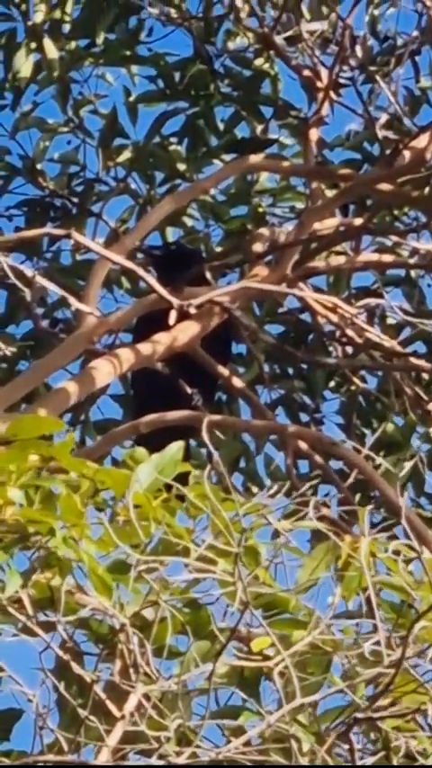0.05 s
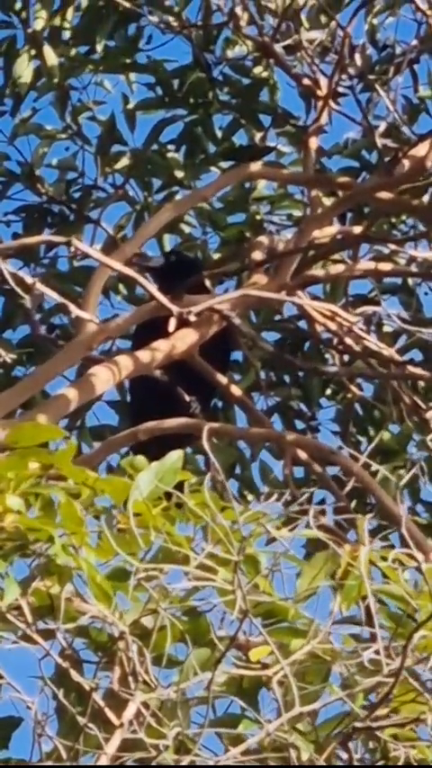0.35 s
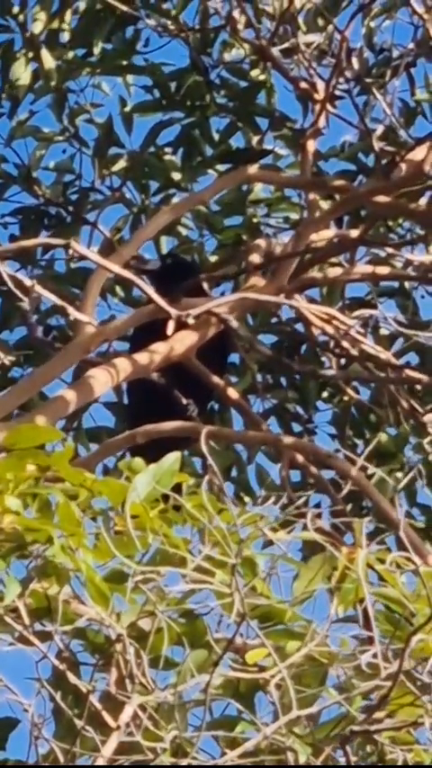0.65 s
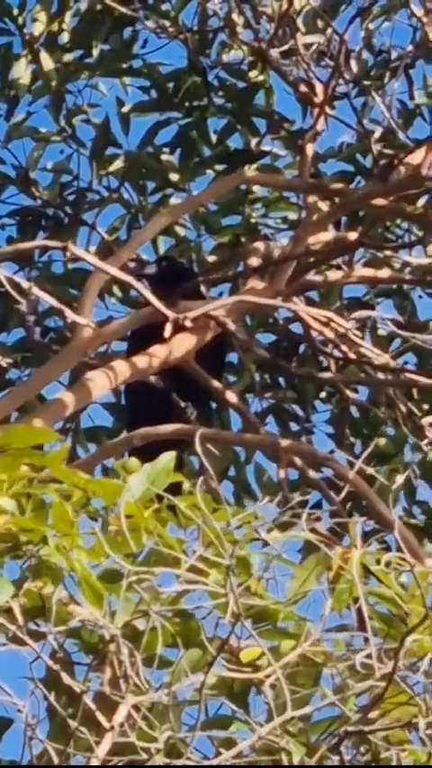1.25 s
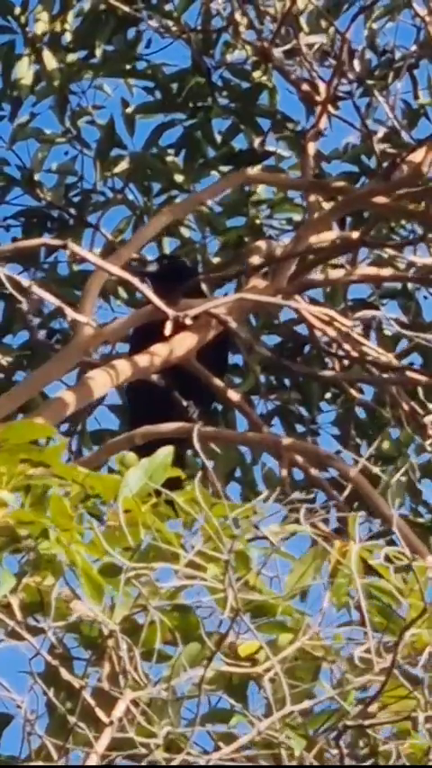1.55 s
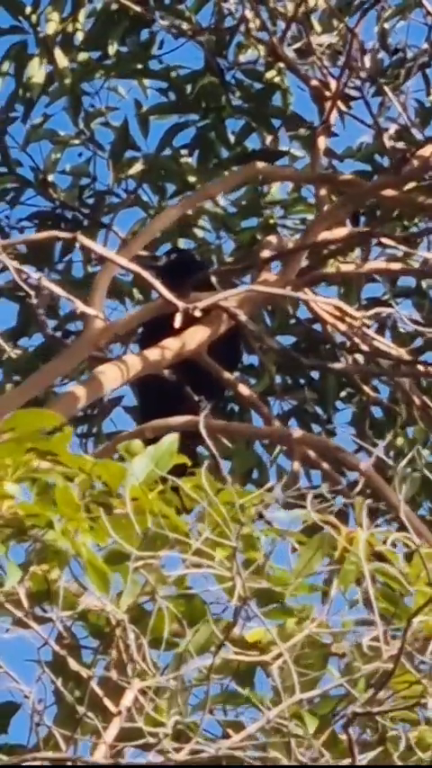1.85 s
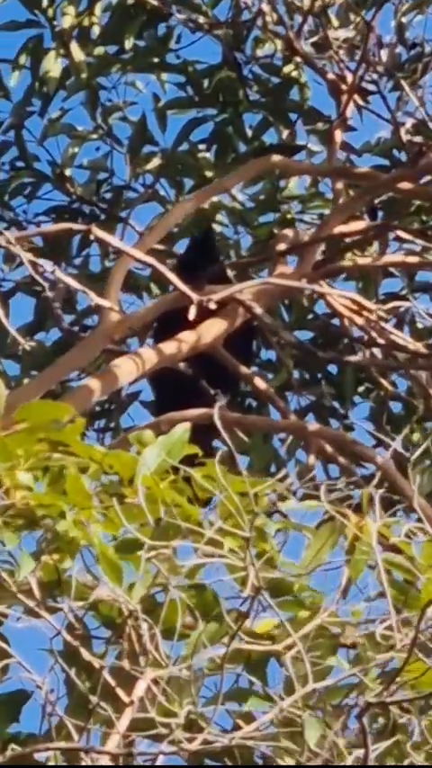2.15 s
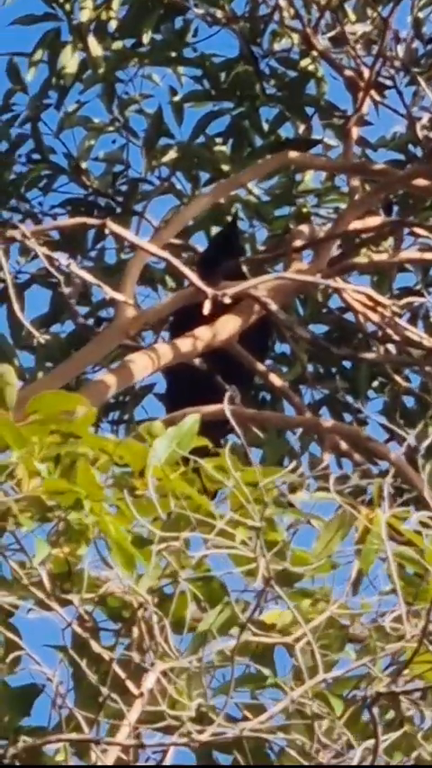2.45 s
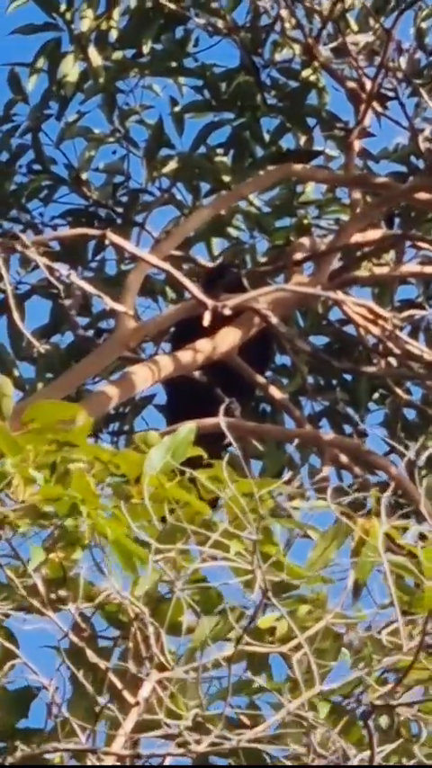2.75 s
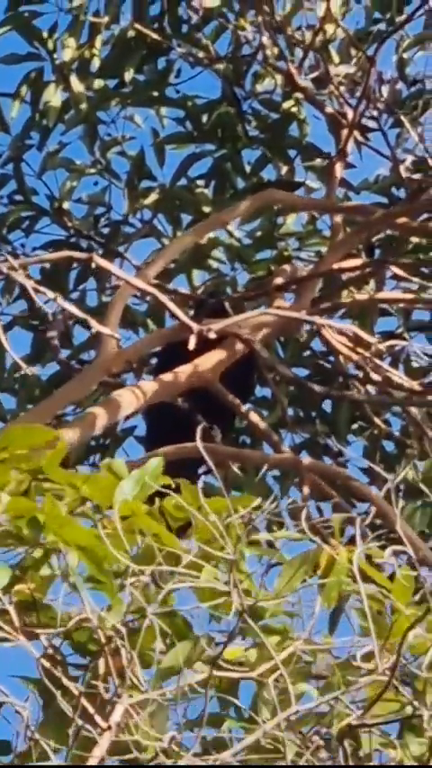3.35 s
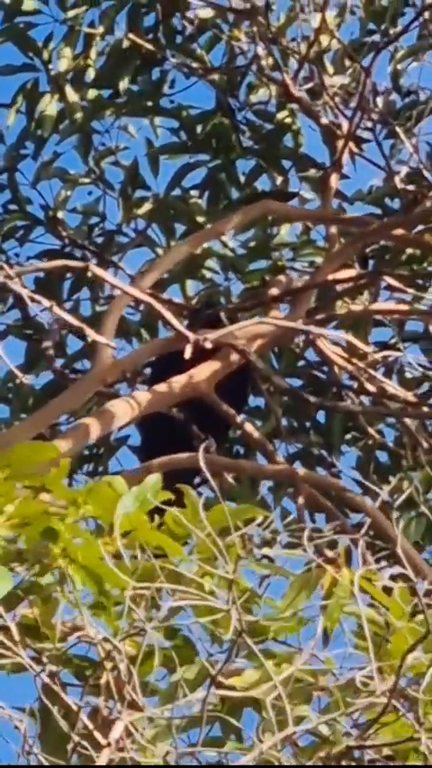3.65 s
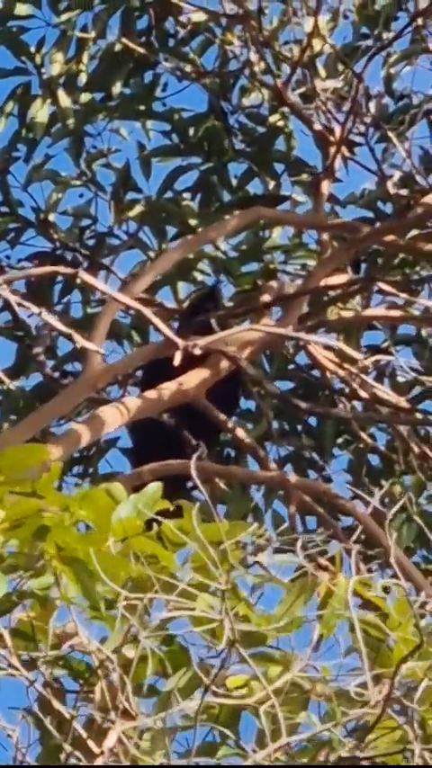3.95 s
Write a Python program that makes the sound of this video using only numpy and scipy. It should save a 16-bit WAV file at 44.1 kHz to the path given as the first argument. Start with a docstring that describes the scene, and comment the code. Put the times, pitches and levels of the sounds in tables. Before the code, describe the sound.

A dry, fast-pulsing bird trill rings from a treetop with a slight echo. It follows a quiet outdoor stretch of low wind rumble, growing leaf rustle, one small microphone tap and faint peeps and whistles from far birds.

```python
"""First comes a low outdoor rumble, with leaves rustling in a rising breeze that also bumps the microphone.
The microphone gets one small tap, tiny birds peep, a far bird trills faintly and a few dry twigs tick.
In the last second a bird high in a tree gives a dry, knocking trill, about 17 pulses a second.
Each pulse rings its throat, then bounces back off the ground and the trees."""
import sys
import numpy as np
from scipy import signal
from scipy.fft import rfft, irfft
from scipy.io import wavfile
from scipy.ndimage import uniform_filter1d

SR = 44100
rng = np.random.default_rng(int(sys.argv[2]) if len(sys.argv) > 2 else 0)


def to_wav(sig):
    """Store sig (one row per channel, or 1-D mono) as 16-bit WAV at the path in sys.argv[1].

    Samples outside -1..1 are clipped; the rate is SR.
    """
    pcm = np.clip(np.atleast_2d(sig), -1, 1) * 32767
    pcm = np.round(pcm).astype(np.int16)
    wavfile.write(sys.argv[1], SR, pcm.T)  # frames by channels


N = 176400

# how alike leaves and twigs sound on the left and right: f/Hz, likeness (1 = the same)
LEAF_LIKENESS = [(3000, 0.0074), (4500, 0), (7000, 0.27), (9000, 1), (15000, 0.76)]
FAR_FADE_S = 0.97  # echo of the far birds; a fade time is how long a sound takes to drop 60 dB


def undb(db):
    """Turn decibels into a factor to multiply by."""
    return 10 ** (np.asarray(db) / 20)


def curve(rows):
    """Join rows of (t/s, value) with straight lines."""
    return np.interp(np.arange(N) / SR, *np.array(rows).T)


def by_freq(rows):
    """Join rows of (f/Hz, value), giving each octave about equal room."""
    hz, value = np.array(rows).T
    return np.interp(np.log(np.fft.rfftfreq(N, 1 / SR) + 1), np.log(hz + 1), value)


def pan(db):
    """Factors that make the left side db louder than the right."""
    return undb(np.array([[db], [-db]]) / 2)


def unit(x):
    """Scale to an average strength (rms) of 1."""
    return x / np.sqrt(np.mean(x ** 2))


def walk(rate):
    """A smooth random wobble; a higher rate makes it faster."""
    width = max(int(SR / rate), 1)
    smoothed = uniform_filter1d(rng.standard_normal(N), width, mode="wrap")
    return unit(uniform_filter1d(smoothed, width, mode="wrap"))


def fade(t, fade_s):
    """Die away by 60 dB every fade_s seconds."""
    return np.exp(-np.log(1000) * t / fade_s)


def ring(t, hz, fade_s):
    """A pure tone that dies away."""
    return np.sin(2 * np.pi * hz * t) * fade(t, fade_s)


def add(out, start_s, sound):
    """Mix a sound in at a given time."""
    i = int(start_s * SR)
    out[..., i:i + sound.shape[-1]] += sound[..., :N - i]


def cut(x, hz, kind, order):
    """Keep the "low" or "high" side of hz; a higher order cuts more sharply."""
    return signal.sosfilt(signal.butter(order, hz, kind, fs=SR, output="sos"), x)


def stereo_noise(gain, likeness):
    """Noise shaped by gain, partly shared between left and right."""
    alike = np.clip(by_freq(likeness), -.98, .98)
    mid, side = rfft(rng.standard_normal((2, N)))
    shared = mid * np.sqrt(1 + alike)
    opposite = side * np.sqrt(1 - alike) * np.array([[1], [-1]])
    return unit(irfft(gain * (shared + opposite), N))


def air():
    """Wind in the surroundings makes a low rumble."""
    colour = [(20, -5), (45, -3), (85, 2.5), (130, -3.5), (220, -5.5), (340, -5.5), (500, -10),
              (750, -12.5), (1100, -18.5), (2200, -16), (3500, -25), (16000, -55)]  # strength from bass to treble: f/Hz, level/dB
    likeness = [(60, 0.33), (130, 0.73), (290, 0.75), (640, 0.49), (1400, -0.2), (3100, -0.26)]  # how alike the two sides are: f/Hz, likeness
    loudness = [(0, -62), (.45, -61.5), (1.0, -61.5), (1.6, -59), (2.2, -58.5), (2.7, -59), (3.3, -58),
                (4, -57.5)]  # slow rise of the rumble: t/s, level/dB
    return stereo_noise(undb(by_freq(colour)), likeness) * undb(curve(loudness) + walk(8.3)) * pan(db=-1.9)


def flutter(x, db):
    """Let every thin slice of the pitch range flicker on its own."""
    bands = signal.stft(x, nperseg=1024)[2]
    flicker = undb(db * rng.standard_normal(bands.shape[1:]))
    return unit(signal.istft(bands * flicker)[1][:, :N])


def leaves():
    """Countless leaves touch, merging into a grainy hiss that follows the breeze."""
    colour = [(1500, -6.5), (2500, -3.5), (3100, -3.5), (4300, -7), (4900, -2.5), (6500, -1.95), (7200, -4),
              (7900, -1), (8700, -4.5), (9500, -6), (10500, -9.5), (11500, -12.5), (12600, -8),
              (15800, -13.5)]  # tone of the hiss: f/Hz, level/dB
    balance = [(2400, 6), (4400, -1.5), (8100, -2.5), (15000, -3.5)]  # which side is louder: f/Hz, left minus right/dB
    breeze = [(0, -78.5), (.4, -75), (.55, -71.5), (.9, -69), (1.35, -66.5), (1.8, -63), (2.2, -59),
              (2.45, -60), (2.8, -58), (3.1, -58.5), (3.4, -56.5), (3.65, -58.5), (3.78, -57), (4, -58.5)]  # how the rustle grows: t/s, level/dB
    flurries = [(.62, 0.04, 5.5), (1.895, 0.01, 6), (2.19, 0.012, 2), (3.385, 0.019, 7), (3.49, 0.028, 1)]  # brief rushes of leaves: t/s, half-width/s, boost/dB
    low_hz, ripple_hz, ripple_db, grain_s, flicker_db = 1470, 139.7, 1.2, 0.0011, 0.97
    hz, t = np.fft.rfftfreq(N, 1 / SR), np.arange(N) / SR
    gain = undb(by_freq(colour)) * hz ** 2 / (hz ** 2 + low_hz ** 2)
    gain = gain * undb(np.array([[1], [-1]]) * by_freq(balance) / 2)
    knots = np.arange(0, SR, ripple_hz)  # fine peaks and dips in the tone
    gain *= undb(ripple_db * np.interp(hz, knots, rng.standard_normal(SR)[:len(knots)]))
    grain = unit(np.exp(0.078 * walk(1 / grain_s)))
    flurry_db = sum(db * np.exp(-((t - middle) / width) ** 2) for middle, width, db in flurries)
    hiss = flutter(stereo_noise(gain, LEAF_LIKENESS), db=3.5)
    return hiss * grain * undb(2 + curve(breeze) + flurry_db + flicker_db * walk(29))


def wind_bumps():
    """Swirls of air push each microphone back and forth a couple of times."""
    bumps = [(0.314, 0.073, -52.5, -3), (0.355, 0.026, -47, 3), (.387, 0.022, -46.5, 3),
             (0.991, 0.059, -52, 11.5), (1.135, 0.033, -47.5, 14), (1.245, 0.029, -51, 16),
             (1.346, 0.048, -46.5, 20), (1.43, 0.08, -51.5, 15), (1.553, 0.055, -51, -10),
             (1.749, 0.047, -43, -4), (1.852, 0.035, -50, 16), (1.934, 0.056, -46.5, -16),
             (3.5, 0.059, -50.5, -7)]  # soft thumps: middle t/s, length/s, level/dB, left minus right/dB
    out, cycles = np.zeros((2, N)), 2.28
    for (middle, length, db, side_db), phase in zip(bumps, rng.random((len(bumps), 2, 1))):
        progress = np.linspace(0, 1, int(length * SR))
        push = np.sin(2 * np.pi * (cycles * progress + phase[0] + phase / 2))
        add(out, middle - length / 2, undb(db) * pan(side_db) * np.sin(np.pi * progress) ** 2 * push)
    return out


def tap():
    """A small tap on the microphone's case makes a click that dies at once."""
    out, t = np.zeros(N), np.arange(SR // 100) / SR
    add(out, start_s=.3835, sound=undb(-42) * ring(t, hz=1500, fade_s=.0016))
    return out


def small_birds():
    """Small birds peep faintly with a fast waver, half lost among the leaves."""
    peeps = [(.59, .03, 5800, -66), (.87, 0.084, 3050, -75), (1.255, 0.034, 5700, -66.5),
             (1.61, 0.15, 3150, -71)]  # far calls: t/s, length/s, f/Hz, level/dB
    voice, waver = np.zeros(N), 1 + .035 * walk(500)
    for start, length, hz, db in peeps:
        pitch = hz * waver[int(start * SR):int((start + length) * SR)]
        add(voice, start, undb(db) * np.hanning(len(pitch)) * np.sin(2 * np.pi * np.cumsum(pitch) / SR))
    return (voice + undb(1) * trees(voice, FAR_FADE_S)) * pan(db=2)


def trees(x, fade_s):
    """Trunks and leaves scatter a blurred echo, high notes more than low ones."""
    t, rise_s = np.arange(SR) / SR, 0.0013
    tail = rng.standard_normal((2, SR)) * fade(t, fade_s) * (1 - np.exp(-t / rise_s))
    highs = cut(x, 2580, "high", order=2)
    return signal.fftconvolve(highs[None], unit(tail) / np.sqrt(SR), axes=1)[:, :N]


def distant_bird():
    """A far bird repeats a hoarse, falling whistle; the trees blur the early ones most."""
    chirps = [(1.38, 2480, -11, -4), (1.458, 2515, -8.5, 5), (1.533, 2535, -5, 6), (1.621, 2520, -7, 3),
              (1.706, 2527, -1, 1), (1.782, 2510, -4, 4), (1.86, 2550, -1, 0), (1.92, 2550, 0.5, 0),
              (1.948, 2270, -6, 5), (1.995, 2540, -4, -3), (2.069, 2625, 1, -6), (2.146, 2545, 2, -8),
              (2.223, 2490, -2, -9), (2.3, 2540, -2, -5), (2.38, 2400, -3.5, 1)]  # whistles: t/s, starting f/Hz, relative level/dB, relative echo/dB
    length_s, fall_hz, roughness = 0.0323, 358, 0.29
    direct, to_trees = np.zeros((2, N))
    progress = np.linspace(0, 1, int(length_s * SR))
    loudness = np.interp(progress, [0, .3, 1], [0, 1, 0])
    slide = (1 + np.tanh(4.8 * (progress - .5))) / 2  # a smooth step from 0 to 1
    for start, hz, db, echo_db in chirps:
        chirp = undb(db - 58.5) * loudness * np.sin(2 * np.pi * np.cumsum(hz - fall_hz * slide) / SR)
        add(direct, start, chirp)
        add(to_trees, start, undb(echo_db) * chirp)
    hoarse = direct * (1 + roughness * walk(900))
    return (hoarse + undb(6.5) * trees(to_trees, FAR_FADE_S)) * pan(db=-1.5)


def twigs():
    """Dry twigs tick and scrape, and each rings briefly afterwards."""
    ticks = [(1.891, -14, 0.0026, 7900, -66), (3.391, -22, 0.016, 5240, -50),
             (3.4624, 0.5, 0.0043, 11300, -48), (3.467, -15.5, 0.03, 4350, -47),
             (3.506, -24, .02, 5040, -54)]  # noise bursts: t/s, relative level/dB, fade/s, ring f/Hz, ring level/dB
    colour = [(100, -55), (3700, -36), (4350, -4), (5600, 1), (7200, 1), (9000, -7.5), (11500, 2.5),
              (12500, -4), (13500, -11), (16000, -16)]  # tone of the bursts: f/Hz, level/dB
    bursts, rings, t = np.zeros(N), np.zeros(N), np.arange(SR // 10) / SR
    for start, db, fade_s, hz, ring_db in ticks:
        add(bursts, start, undb(db - 28.5) * fade(t, fade_s))
        add(rings, start, undb(ring_db) * ring(t, hz, min(0.04, 2 * fade_s)))
    noise = stereo_noise(undb(by_freq(colour)), LEAF_LIKENESS)
    return cut(rings + bursts * noise, 3900, "high", order=6)


def trill():
    """Each pulse swells in softly, then rings the bird's throat over a low, woody knock."""
    pulses = [(3.033, -7, 1, 4), (3.0905, -6, 1, -1), (3.1474, -5, 0.98, 2), (3.2028, -4, 0.99, 0.5),
              (3.2589, -2.1, 1, 3.5), (3.3120, -3.5, 1, 1), (3.3681, -2, 1, 5), (3.4238, -2, 0.99, 2.5),
              (3.482, -1.3, 0.98, 2), (3.5403, -0.5, 1, 7), (3.5985, -1, 1, 3), (3.6574, -.3, 1, 2.5),
              (3.7133, -1, 0.99, 2.5), (3.7728, -0.5, 1, 0), (3.8309, -0.5, 1, -0.5), (3.8891, -2, 1, -3),
              (3.9477, -6, 0.882, 4.5)]  # the trill's beats: t/s, relative level/dB, pitch factor, upper-tone boost/dB
    throat = [(1728, 1.44, 0.022), (1993, -15, 0.02), (2140, -16.5, 0.018)]  # tones the throat rings at: f/Hz, relative level/dB, fade/s
    pitch_spread, upper_spread_db = 0.0012, 1.5
    rise_s, swell_s, swell_db = 0.00016, 0.0096, -20.5
    voice, t = np.zeros(N), np.arange(SR // 20) / SR
    hz, db, fade_s = np.array(throat).T[:, :, None]
    upper = hz > hz.min()
    onset, swell = 1 - np.exp(-t / rise_s), np.exp(-t / swell_s)[::-1]
    for start, level, tuning, upper_db in pulses:
        pitch_luck, level_luck = rng.standard_normal((2, len(throat), 1))
        tones = ring(t, hz * tuning * (1 + pitch_spread * pitch_luck), fade_s)
        gains = undb(level + db + upper * (upper_db + upper_spread_db * level_luck))
        pulse = (tones * gains).sum(0) * onset
        throat_noise = unit(signal.fftconvolve(rng.standard_normal(2 * len(t)), pulse, "valid")[:len(t)])
        add(voice, start, pulse)
        add(voice, start + rise_s - t[-1], undb(level + swell_db) * swell * throat_noise)
    voice = cut(voice, 2294, "low", order=12)
    voice = undb(-21) * cut(voice, 1350, "high", order=2)
    for start, level, _, _ in pulses:  # the woody knocks
        add(voice, start, undb(level - 38) * ring(t, hz=493, fade_s=0.0045))
    return voice


def from_treetop(voice):
    """A call arrives directly, then bounces off the ground, single branches and the trees around."""
    branches = [(0.0134, -19, 2), (0.0169, -17.5, -2), (0.028, -21, 6), (.047, -19, -8), (0.0541, -20, 5)]  # echoes off trunks and branches: delay/s, level/dB, left minus right/dB
    heard = np.zeros((2, N))
    # the right microphone hears the call a little later, but the ground's echo sooner
    for side, delay_s, ground_s in (0, 0, .00815), (1, .000046, .00763):
        add(heard[side], delay_s, voice)
        add(heard[side], delay_s + ground_s, voice)
    for delay_s, db, side_db in branches:
        add(heard, delay_s, undb(db) * pan(side_db) * voice)
    return heard * pan(db=-0.9) + undb(0.5) * trees(voice, fade_s=0.44)


def scene():
    """Birds among breezy trees."""
    birds = from_treetop(trill()) + distant_bird() + small_birds()
    return birds + leaves() + twigs() + wind_bumps() + tap() + air()


def record(dry):
    """Cut away the highest treble, above 15900 Hz."""
    return signal.sosfilt(signal.ellip(10, .2, 70, 15900, fs=SR, output="sos"), dry)


dry = scene()
out = record(dry)
to_wav(out)
```